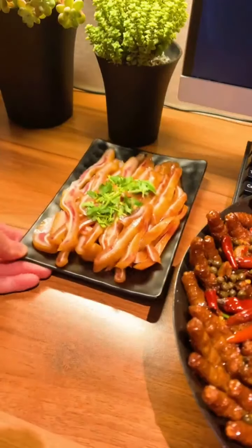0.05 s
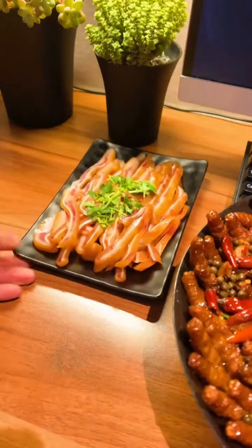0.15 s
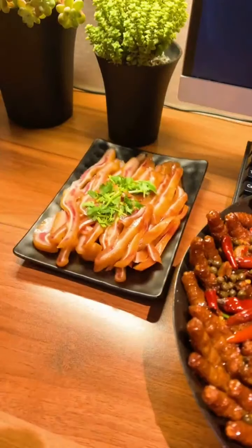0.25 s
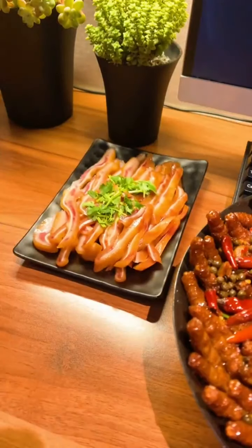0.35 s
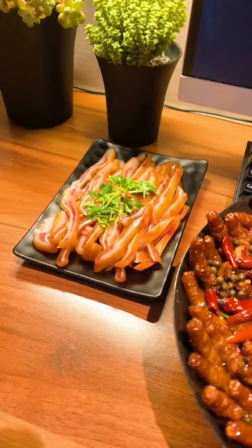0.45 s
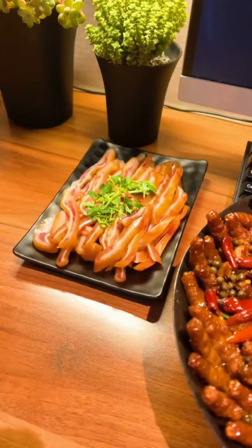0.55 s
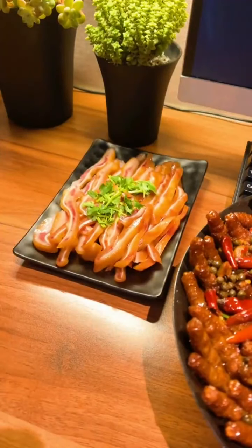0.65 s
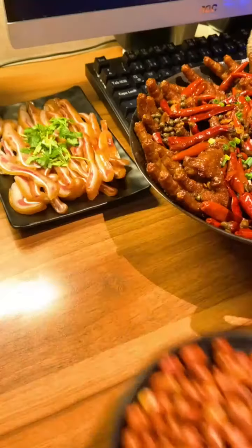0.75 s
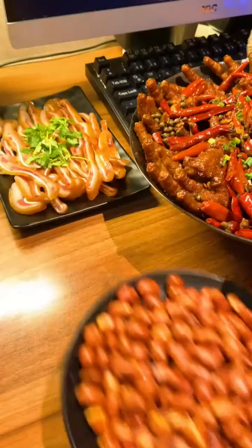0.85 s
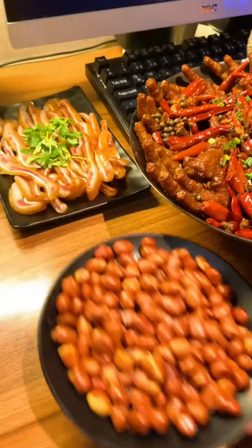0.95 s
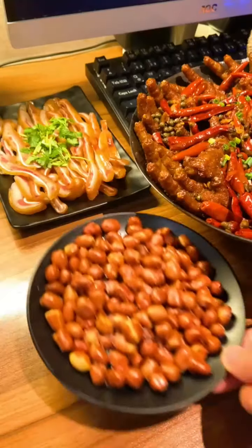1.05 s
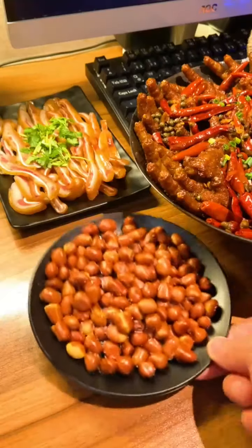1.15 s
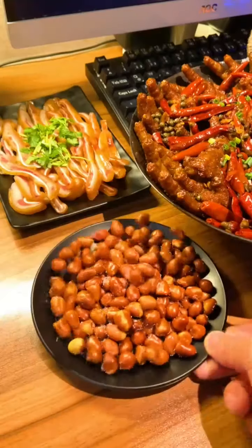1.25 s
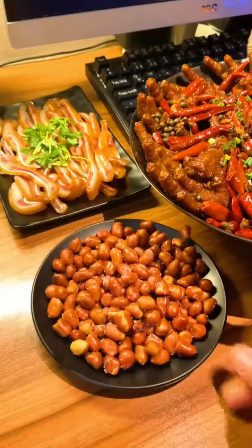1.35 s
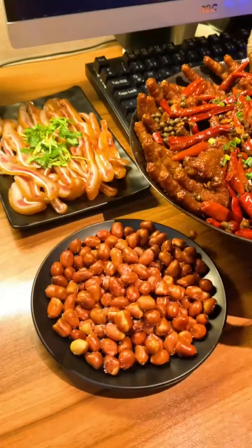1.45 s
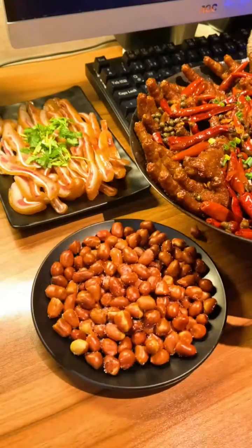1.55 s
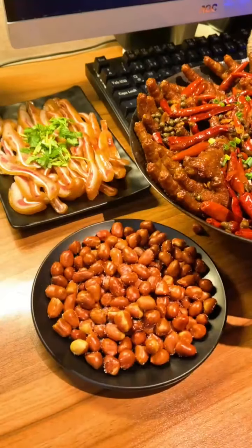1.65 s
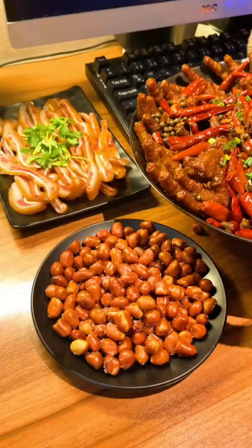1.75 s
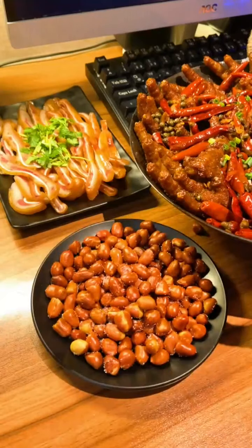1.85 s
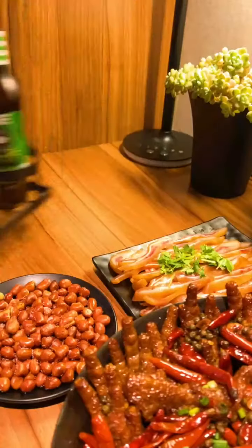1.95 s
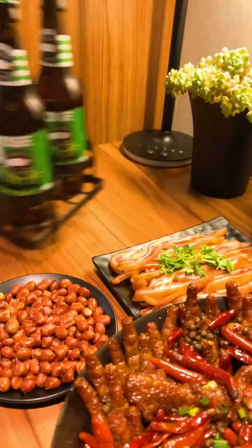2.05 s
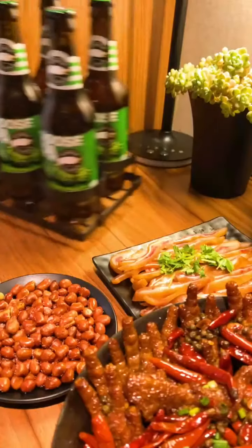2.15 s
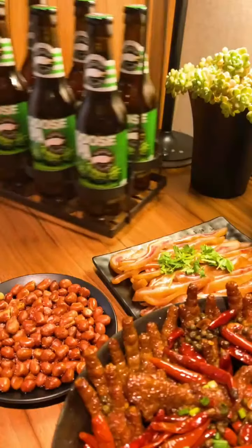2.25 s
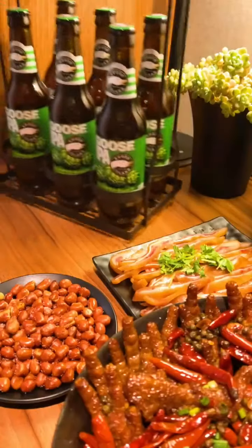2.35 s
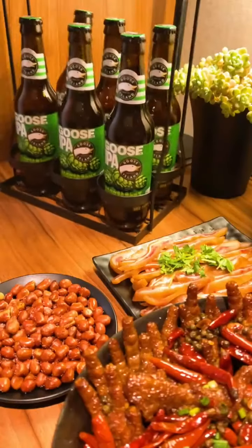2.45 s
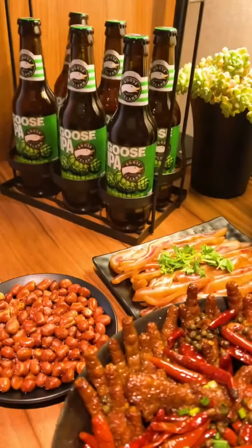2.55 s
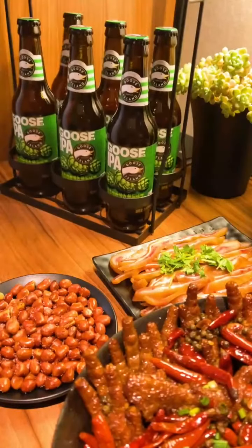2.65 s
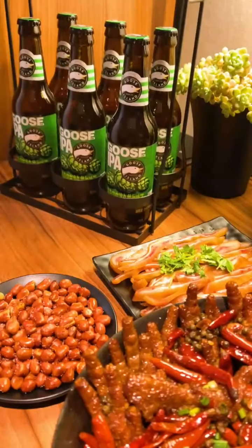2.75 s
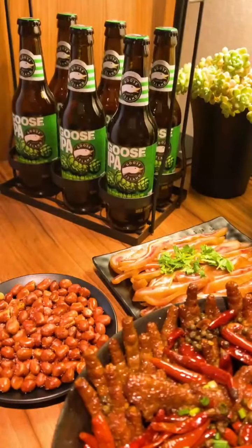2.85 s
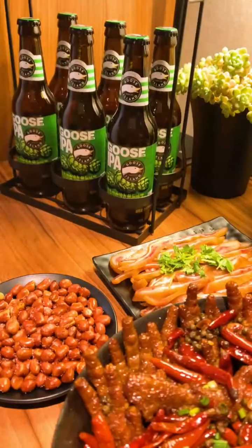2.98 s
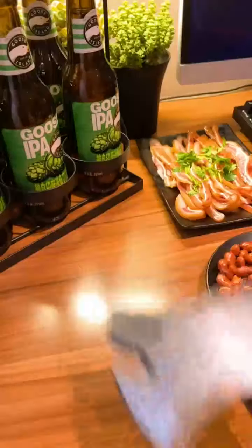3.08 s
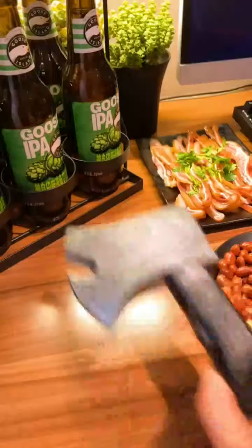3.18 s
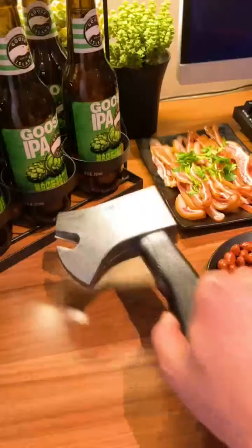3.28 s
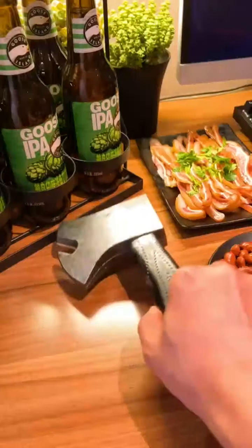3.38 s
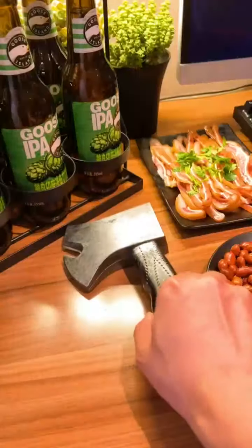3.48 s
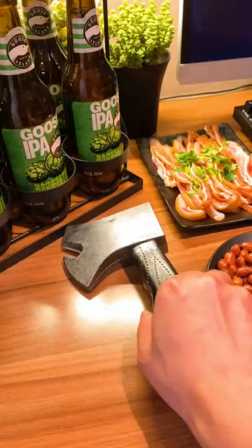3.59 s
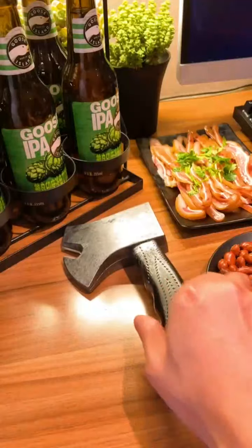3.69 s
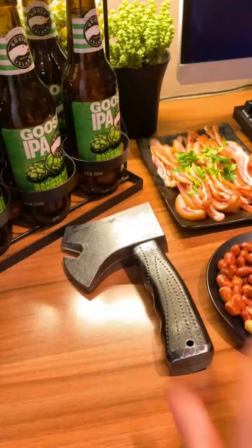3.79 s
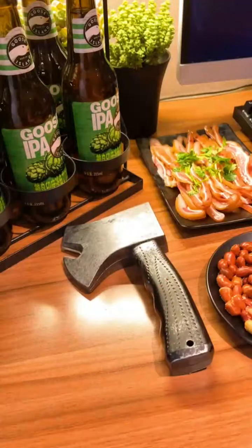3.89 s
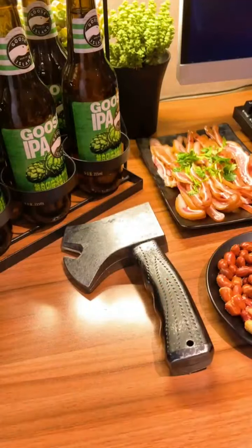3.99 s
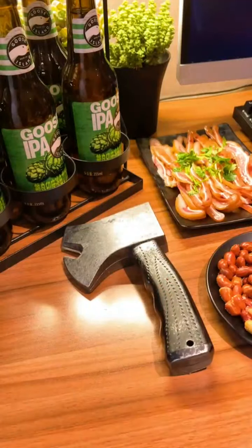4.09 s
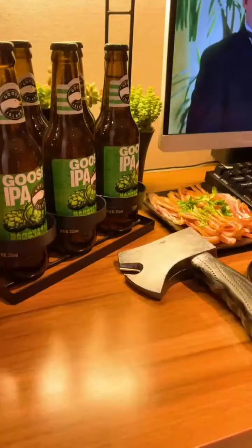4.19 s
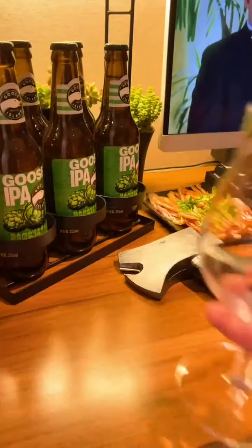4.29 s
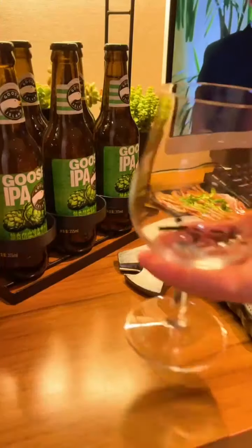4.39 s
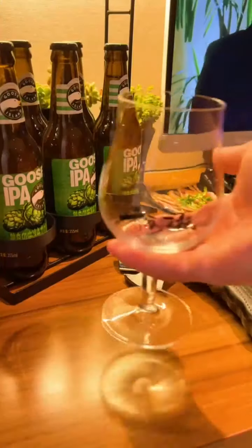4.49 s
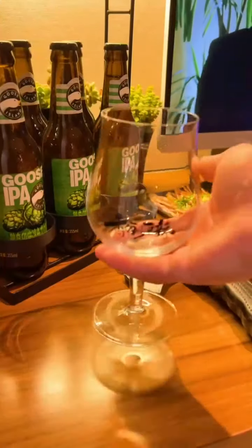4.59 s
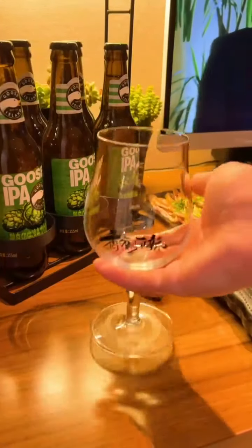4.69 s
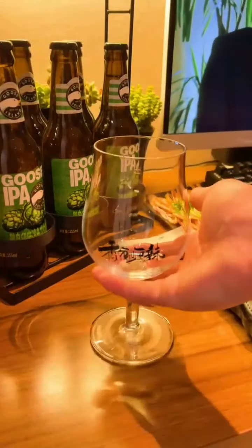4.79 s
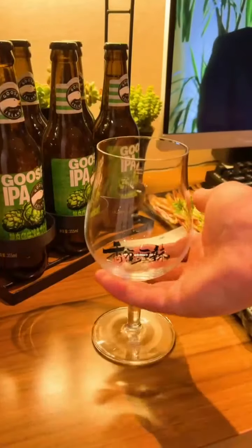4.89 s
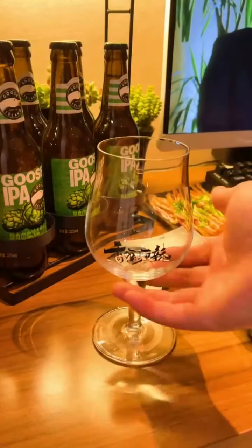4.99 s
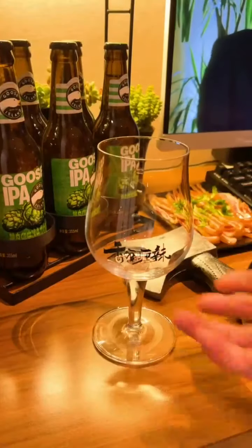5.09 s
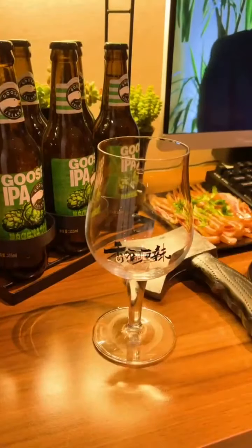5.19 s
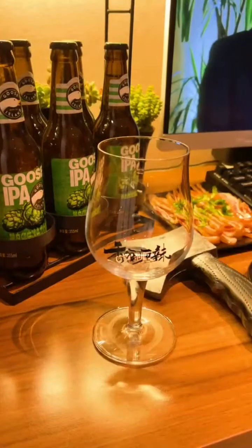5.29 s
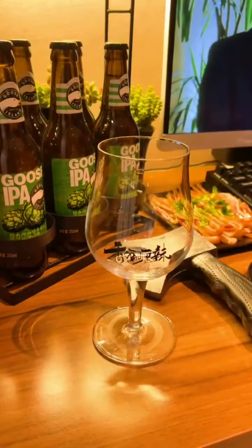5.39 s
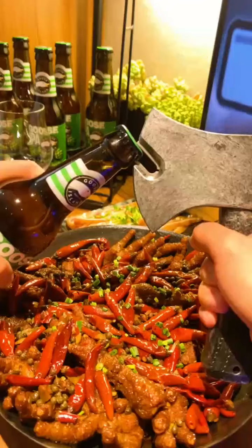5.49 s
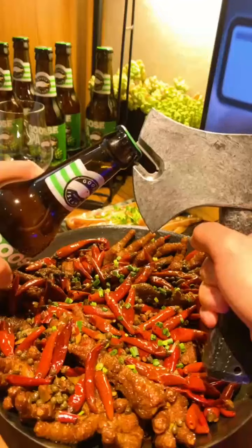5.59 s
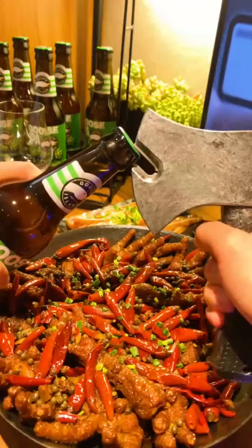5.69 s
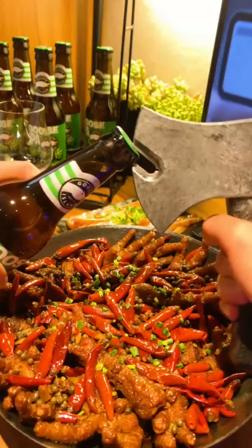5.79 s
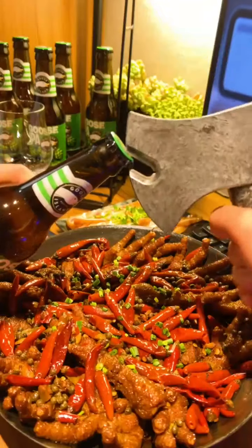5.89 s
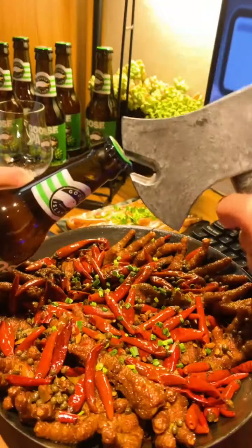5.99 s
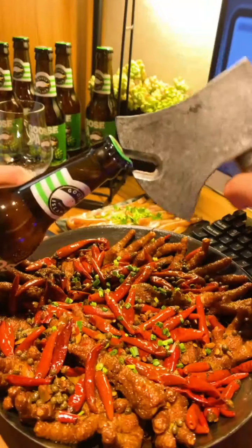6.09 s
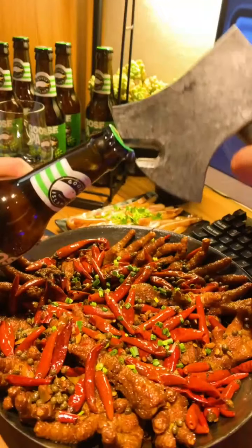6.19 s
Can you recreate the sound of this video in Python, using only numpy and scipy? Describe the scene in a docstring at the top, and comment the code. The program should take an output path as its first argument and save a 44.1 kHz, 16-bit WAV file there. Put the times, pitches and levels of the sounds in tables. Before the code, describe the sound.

Close-miked objects land one by one on a wooden desk: a plate in a double knock, a louder dish with peanut ticks, a boomy wire crate with jingling bottles, a hatchet in a dull double clunk, and a stemmed glass in a quick patter. Abrupt edits stop each tail. Last, a pressurized bottle gives a brief, high, sputtering hiss in the small room, over soft fan hum.

```python
"""Two plates, a wire crate of beer bottles, a hatchet and a stemmed glass are set down on a wooden desk
in a small room: each contact sums a noise crack, a noise knock dying in the room, and modes of thing and desk.
Then a crown cap is levered up and gas hisses out: shaped noise with whistles, under a draining-pressure envelope.
Bottles clink, peanuts tick, a thin hum and a fan drone lie behind. Each cut ends whatever still rings.
The knocks overload a close microphone."""
import sys
import numpy as np
from scipy import signal
from scipy.fft import rfft, irfft, next_fast_len
from scipy.io import wavfile

SR = 44100
rng = np.random.default_rng(int(sys.argv[2]) if len(sys.argv) > 2 else 0)


def transcribe(u):
    """Save the signal u as a 16-bit wav file named by the first command-line argument.

    u: samples, shape (n,) or (channels, n), limited to [-1, 1]; the rate is SR.
    q: integer samples, one column per channel.
    """
    v = np.clip(np.atleast_2d(u).T, -1, 1)
    q = np.round(v * 32767).astype(np.int16)
    wavfile.write(sys.argv[1], SR, q)


N = 275184

# Cuts that end every ring. Each entry: time in seconds.
CUTS = [.728, 1.887, 3.081, 4.213, 5.448]
# Landings of the crate. Each row: start in seconds, level in dB.
CRATE_CONTACTS = [(2.409, -33), (2.4262, -7)]
# Crate rocking to rest. One row: start in seconds, level in dB, first gap in seconds, loss per contact in dB.
CRATE_ROCKING = (2.497, -5, .042, 6.2)
# Gas jet spectrum. Each row: frequency in Hz, relative level in dB per Hz.
JET_SPECTRUM = [(100, -39), (500, -30.5), (2500, -25.5), (3900, -17), (4600, -10.5), (6800, -6.5),
                (8500, -2), (9800, -4.5), (10800, -10), (12500, -16), (14000, -9.5), (16000, -19)]


def amp(db):
    """Decibels to gain."""
    return 10 ** (np.asarray(db) / 20)


def unit(x):
    """Scale to rms 1."""
    return x / np.sqrt(np.mean(x ** 2) + 1e-20)


def along(points, hz):
    """Interpolate (Hz, value) points on a log frequency axis."""
    f, v = np.transpose(points)
    return np.interp(np.log(hz + 1), np.log(f + 1), v)


def filtered(x, response):
    """Multiply the spectrum of x by a response of frequency."""
    m = next_fast_len(len(x) + SR // 4)
    spectrum = rfft(x, m) * response(np.fft.rfftfreq(m, 1 / SR))
    return irfft(spectrum, m)[:len(x)]


def noise(response, size):
    """Coloured noise of rms 1."""
    return unit(filtered(rng.standard_normal(size), response))


def jet_noise(size):
    """Noise with the gas jet's spectrum."""
    return noise(lambda hz: amp(along(JET_SPECTRUM, hz)), size)


def resonances(peaks, hz):
    """Response of (Hz, width Hz, dB) resonances in parallel."""
    return sum(amp(db) * 1j * hz * w / (c * c - hz * hz + 1j * hz * w) for c, w, db in peaks)


def dying(x, t60_scale):
    """Each frequency of x decays at the room's rate."""
    # Room decay. Each row: frequency in Hz, t60 in seconds at scale 1.
    room_decay = [(60, .35), (200, 0.89), (600, 0.41), (1400, 0.35), (3000, 0.28), (6000, 0.23),
                  (14000, 0.17)]
    hz, t, z = signal.stft(x, SR, nperseg=256)
    t60 = t60_scale * along(room_decay, hz)[:, None]
    fall = np.exp(-np.log(1000) * t / t60)
    return signal.istft(z * fall, SR, nperseg=256)[1][:len(x)]


def fade(t60):
    """One second of exponential decay."""
    return np.exp(-np.log(1000) * np.arange(SR) / SR / t60)


def ring(modes, scatter_db, waver=.45, attack_s=.0005):
    """Decaying modes of random strength; reflections make each one waver in level and phase."""
    out = np.zeros(SR)
    for hz, db, t60 in modes:
        t = np.arange(min(SR, int(1.5 * t60 * SR))) / SR
        strength, phase = rng.standard_normal(2)
        points = rng.standard_normal(36) + 1j * rng.standard_normal(36)
        echoes = np.interp(t, np.linspace(0, 1, 36), points)
        tone = (1 + waver * echoes) * np.exp(2j * np.pi * (hz * t + phase))
        envelope = np.exp(-np.log(1000) * t / t60) * (1 - np.exp(-t / attack_s))
        out[:len(t)] += amp(db + scatter_db * strength) * envelope * unit(tone.real)
    return out


def add(track, s, sound):
    """Place a sound at s seconds; the next cut ends it."""
    start = round(s * SR)
    later_cuts = [round(c * SR) for c in CUTS if c > s]
    end = min(later_cuts + [N, start + len(sound)])
    track[start:end] += sound[:end - start]


def chime(strikes, modes, waver):
    """Light touches: modes ring without a knock."""
    out = np.zeros(N)
    for s, db in strikes:
        add(out, s, amp(db) * ring(modes, scatter_db=1, waver=waver))
    return out


def rocking(rock, count):
    """(s, dB) contacts of a thing that rocks to rest, each sooner and weaker than the last."""
    s, db, gap_s, loss_db = rock
    k = np.arange(count)
    gaps_s = gap_s * .92 ** k
    return list(zip(s + np.cumsum(gaps_s) - gaps_s, db - loss_db * k))


def room_tone(air_db, drone_db, near_db):
    """Still air and a computer fan's low drone as shaped noise; more resonances join after the last cut."""
    # Air spectrum. Each row: frequency in Hz, relative level in dB per Hz.
    air_spectrum = [(15, -70), (25, -39), (43, -19.5), (97, -13.5), (130, -17), (217, -1), (249, -13),
                    (326, -7.5), (363, -13.5), (607, -14.5), (962, -17.5), (1330, -15.5), (1700, -21.5),
                    (14800, -34.5), (16000, -37.5)]
    drone_peaks = [(220, 27, 2.5), (337, 12, -14.5), (584, 20, -12.5), (1280, 50, -20)]
    near_peaks = [(93, 9.6, -2), (339.3, 10.5, 3), (426.4, 13.7, -1), (493, 20, -15)]
    air = noise(lambda hz: amp(along(air_spectrum, hz)), N)
    drone = noise(lambda hz: resonances(drone_peaks, hz), N)
    near = noise(lambda hz: resonances(near_peaks, hz), N)
    after_last_cut = np.arange(N) / SR > CUTS[-1]
    return amp(air_db) * air + amp(drone_db) * drone + amp(near_db) * near * after_last_cut


def hum(start_s, attack_s, level_db):
    """Narrow noise band swells after the dish has settled and holds until the cut."""
    out = np.zeros(N)
    swell = np.minimum(np.arange(SR) / SR / attack_s, 1)
    tone = noise(lambda hz: resonances([(377, 8, 0)], hz) ** 2, SR)
    add(out, start_s, amp(level_db) * swell * tone)
    return out


def peanuts(start_s, span_s, level_db, fall_db, count):
    """Peanuts hop in the dish and settle: noise ticks of random strength, fainter on the whole."""
    spectrum = [(1500, -13), (5500, 5), (9000, -2), (15000, -15.5)]
    out = np.zeros(N)
    for when, size in zip(np.linspace(0, 1, count), rng.standard_normal(count)):
        tick = noise(lambda hz: amp(along(spectrum, hz)), SR) * fade(.088)
        s = start_s + span_s * (when + rng.random() / count)
        add(out, s, amp(level_db - fall_db * when + 2.9 * size) * tick)
    return out


def wire():
    """A bottle leans into the crate's wire, which rings in its modes."""
    # Wire contact. Each row: start in seconds, level in dB.
    strikes = [(2.742, -34)]
    # Wire modes. Each row: frequency in Hz, relative level in dB, t60 in seconds.
    modes = [(1100, -10, .2), (1440, -4, .2), (1523, -4, .25)]
    return chime(strikes, modes, waver=.6)


def bottles(jolt_db, clink_db, carry_s, carry_span_s, carry_db, count):
    """Bottles touch while carried, jingle on landing, then knock together; one rings on in its own modes."""
    # Knocks between bottles. Each row: start in seconds, level in dB before clink_db.
    clinks = [(2.5644, -9), (2.7414, -32), (2.7721, -25), (2.8944, -40)]
    # Bottle modes. Each row: frequency in Hz, relative level in dB, t60 in seconds.
    bottle_modes = [(1480, -3, .2), (2115, -3, .3), (2440, -6, .2), (2600, -8, .15), (2745, -8, .18),
                    (3563, -7, .13), (3690, -6, .13), (4145, -15, .12), (6400, -16, .12), (6900, -16, .12)]
    # Modes of the one that rings on. Each row: frequency in Hz, level in dB, t60 in seconds.
    lasting_modes = [(2112, -24, .85), (2143, -28, .8), (6406, -36, .35)]
    carried = [(carry_s + carry_span_s * (k + chance / 2) / count, carry_db)
               for k, chance in enumerate(rng.random(count))]
    landings = CRATE_CONTACTS + rocking(CRATE_ROCKING, count=3)
    jolted = [(s, db + jolt_db) for s, db in landings]
    knocked = [(s, db + clink_db) for s, db in clinks]
    jingle = chime(carried + jolted + knocked, bottle_modes, waver=.6)
    return jingle + chime([(2.54, 0)], lasting_modes, waver=.4)


def gas_flow(seal_opens_s, drain_s, gas_db):
    """The gap widens as the cap bends, and the neck's pressure drains through it."""
    u = np.maximum(np.arange(N) / SR - seal_opens_s, 0) / drain_s
    gap, pressure = u ** 2, np.exp(-u ** 3)
    return amp(gas_db) * gap * pressure


def bottle_cap(whistle_db, flutter_db, room_db):
    """Gas jets through the lifted crimps and whistles in them; ticks mark the slipping notch and cracking seal."""
    # Whistles in the crimps. Each row: frequency in Hz, width in Hz, relative level in dB.
    whistles = [(8190, 24, 0), (8440, 16, 2), (8670, 60, -7), (9128, 16, -3), (9711, 24, -1)]
    # Hatchet notch slips on the cap, seal cracks. Each row: start in seconds, level in dB.
    ticks = [(5.8174, -47.5), (5.8925, -21), (6.085, -46.5)]
    flutter = noise(lambda hz: hz < 400, N)  # the wet seal sputters
    jet = jet_noise(N)
    whistle = noise(lambda hz: resonances(whistles, hz), N)
    flow = gas_flow(seal_opens_s=5.878, drain_s=.067, gas_db=-2)
    out = flow * amp(flutter_db * flutter) * unit(jet + amp(whistle_db) * whistle)
    for s, db in ticks:
        add(out, s, amp(db) * jet_noise(SR) * fade(.018))
    # the walls swallow the top
    tail = dying(noise(lambda hz: 1 / (1 + (hz / 8000) ** 2), SR), t60_scale=.85)
    reverb = signal.fftconvolve(out, tail / np.linalg.norm(tail))[:N]
    return out + amp(room_db) * reverb


def set_down(contacts, knock, modes, crack_db, crack_t60, softening, boom_db, tilt_db, t60_scale,
             boom_rise=0, dulling=0, shortening=0, soft_hz=np.inf, ripple_db=4):
    """Each contact: a short direct crack, a knock that fills the room, the thing's ring, the desk's boom."""
    # Desk modes. Each row: frequency in Hz, relative level in dB, t60 in seconds.
    desk_modes = [(154.8, -9.5, 0.49), (167.5, -4.5, 0.14), (184, -13.5, 0.12), (209.5, -4.5, 0.39),
                  (252, -3.5, .35), (334, -4.5, .35), (435, -8.5, .3), (553.5, -2, 0.37)]
    out = np.zeros(N)
    grid_hz = np.geomspace(700, 16000, 170)
    # crowded small modes, alike at every contact
    ripple = ripple_db * np.clip(rng.standard_normal(len(grid_hz)), -1.5, 1.5)
    hardest_db = max(db for s, db in contacts)
    for s, db in contacts:
        # per dB under the hardest contact: duller (dB per octave), shorter, another share of boom
        lighter_db = hardest_db - db
        tilt = tilt_db - dulling * lighter_db
        scale = t60_scale * np.exp(-shortening * lighter_db)

        def colour(hz):
            level_db = along(knock, hz) + np.interp(hz, grid_hz, ripple, left=0)
            level_db = level_db + tilt * np.log2(1 + hz / 1000)
            return amp(level_db) / np.sqrt(1 + (hz / soft_hz) ** 8)  # a soft contact has no top

        # softening: the crack loses extra dB per dB of level
        crack = amp(crack_db + softening * db) * noise(colour, SR) * fade(crack_t60 * scale)
        body = dying(noise(colour, SR), scale)
        boom = amp(boom_db + boom_rise * lighter_db) * ring(desk_modes, scatter_db=1.5, attack_s=.004)
        mode_tilt = .38 * dulling * lighter_db  # share of the dulling that reaches the modes
        struck = [(hz, mode_db - mode_tilt * np.log2(1 + hz / 1000), t60) for hz, mode_db, t60 in modes]
        add(out, s, amp(db) * (crack + body + ring(struck, scatter_db=.37) + boom))
    return out


def plate():
    """A plate lands twice; the lighter contact is duller and shorter."""
    # Contacts. Each row: start in seconds, level in dB.
    contacts = [(.0452, -6.5), (.075, -12.5)]
    # Knock spectrum. Each row: frequency in Hz, relative level in dB per Hz.
    knock = [(40, -20), (120, -25), (220, -4.5), (370, -10.5), (520, 1), (1100, 1.5), (1500, -1),
             (3100, -3.5), (6000, -12.5), (10000, -29.5), (16000, -35)]
    # Modes. Each row: frequency in Hz, relative level in dB, t60 in seconds.
    modes = [(484, -7, .16), (710, -20, .45), (935, -13, .2), (1130, -13, .25), (2077, -24, .45),
             (2250, -14, .18), (2950, -11, .17), (3079, -11, .22), (4123, -17, .18)]
    return set_down(contacts, knock, modes, crack_db=9.5, crack_t60=.12, softening=.1, boom_db=-13,
                    tilt_db=2.3, t60_scale=1, boom_rise=-.8, dulling=1.5, shortening=.14)


def dish():
    """The second plate, a dish, lands, a finger flicks off its rim, and it rocks to rest in soft contacts."""
    # Landings, then rim flick. Each row: start in seconds, level in dB.
    contacts = [(1.1795, -0.5), (1.204, -14.5), (1.258, -19), (1.272, -18.5), (1.292, -21)]
    rim_contacts = [(1.473, -35)]
    # Rocking. One row: start in seconds, level in dB, first gap in seconds, loss per contact in dB.
    rock = (1.5135, -32, .0305, 3.7)
    # Knock spectra of dish and rim. Each row: frequency in Hz, relative level in dB per Hz.
    knock = [(40, -20), (120, -19.5), (200, -13.5), (400, -9), (700, -4), (1200, 2), (2000, -4),
             (3300, -5.5), (6000, -10), (9000, -25.5), (16000, -31)]
    rim_knock = [(200, -8), (650, 3), (1300, -6), (4500, -12), (9000, -10), (16000, -15)]
    # Modes. Each row: frequency in Hz, relative level in dB, t60 in seconds.
    modes = [(592, -10, .17), (624, -23, .35), (860, -10, .22), (1030, -11, .22), (1238, -11, .3),
             (1625, -13, .2), (2379, -19, .16), (3316, -25, .22), (4855, -21, .13)]
    landing = set_down(contacts, knock, modes, crack_db=4, crack_t60=.14, softening=.03, boom_db=-15,
                       tilt_db=2.7, t60_scale=.9, boom_rise=-.2, dulling=.24, shortening=.026)
    rim = set_down(rim_contacts, rim_knock, modes, crack_db=2, crack_t60=.14, softening=0, boom_db=-30,
                   tilt_db=0, t60_scale=.2)
    settling = set_down(rocking(rock, count=4), knock, modes, crack_db=3, crack_t60=.14, softening=0,
                        boom_db=-30, tilt_db=2.5, t60_scale=.32, dulling=.25, soft_hz=4400)
    return landing + rim + settling


def crate():
    """The wire crate lands and rocks with strong desk boom, then wobbles in dull, soft contacts."""
    # Late wobble. Each row: start in seconds, level in dB.
    wobble_contacts = [(2.772, -31.5), (2.87, -39), (2.937, -33.5), (2.995, -46)]
    # Knock spectrum. Each row: frequency in Hz, relative level in dB per Hz.
    knock = [(40, -23), (110, -10), (170, -1.5), (350, -2.5), (550, 4.5), (800, -3), (1400, 1.5),
             (1900, -9), (2500, -6), (5000, -20.5), (6800, -24), (8500, -37.5), (16000, -45)]
    # Modes. Each row: frequency in Hz, relative level in dB, t60 in seconds.
    modes = [(156, -24, 1.1), (168, -7, .3), (247, -21, 1.0), (549, -23, .8), (1173, -13, .25),
             (2433, -15, .22), (3563, -26, .2)]
    landings = CRATE_CONTACTS + rocking(CRATE_ROCKING, count=3)
    landing = set_down(landings, knock, modes, crack_db=5, crack_t60=.22, softening=.2, boom_db=-5.5,
                       tilt_db=2.2, t60_scale=.76, boom_rise=-.7, dulling=.05)
    wobble = set_down(wobble_contacts, knock, modes, crack_db=-5, crack_t60=.22, softening=0, boom_db=-1.5,
                      tilt_db=-5.5, t60_scale=1.1, boom_rise=.5, dulling=1.3, soft_hz=3500)
    return landing + wobble


def hatchet():
    """The hatchet lands twice; the lighter contact has relatively more desk boom."""
    # Contacts. Each row: start in seconds, level in dB.
    contacts = [(3.4502, -4.4), (3.486, -11)]
    # Knock spectrum. Each row: frequency in Hz, relative level in dB per Hz.
    knock = [(40, -36.5), (120, -28), (200, -18), (370, -8), (620, 0), (1050, -6), (1450, -17.5),
             (3100, -13), (4500, -20), (7000, -23.5), (10000, -43), (16000, -47.5)]
    # Modes. Each row: frequency in Hz, relative level in dB, t60 in seconds.
    modes = [(440, -12, .2), (624, -19, .9), (636, -8, .2), (672, -11, .2), (765, -26, .5), (1022, -11, .2),
             (1087, -14, .2), (1141, -26, .42), (2088, -33, .48), (2734, -21, .15)]
    return set_down(contacts, knock, modes, crack_db=7.5, crack_t60=.15, softening=.1, boom_db=-17,
                    tilt_db=-.1, t60_scale=.77, boom_rise=1.6)


def glass():
    """The stemmed glass rocks to rest on its foot while its bowl sings on in beating mode pairs."""
    # Rocking. One row: start in seconds, level in dB, first gap in seconds, loss per contact in dB.
    rock = (4.7357, -7.5, .0249, 1.9)
    # Knock spectrum. Each row: frequency in Hz, relative level in dB per Hz.
    knock = [(40, -41), (115, -24.5), (200, -12), (450, -5.5), (700, -2), (1200, -13), (2100, -4.5),
             (2900, -21.5), (4600, -22.5), (6200, -13.5), (8500, -31.5), (16000, -37)]
    # Modes of the knocked glass, then of its bowl. Each row: frequency in Hz, level in dB, t60 in seconds.
    modes = [(330, -10, .25), (667, -6, .24), (800, -9, .2), (2050, -8, .22), (3490, -10, .14),
             (3525, -6, .17), (5297, -19, .24), (5695, -16, .17), (6400, -8, .05), (10131, -22, .17),
             (11929, -28, .16)]
    bowl_modes = [(792, -45.5, 12), (800.8, -44.5, 12), (1974, -46, 3.3), (1998.6, -39, 3.3),
                  (3735, -40, .85)]
    landing = set_down(rocking(rock, count=6), knock, modes, crack_db=7.5, crack_t60=.056, softening=.1,
                       boom_db=-13, tilt_db=1, t60_scale=.88, boom_rise=.95, dulling=.4, shortening=.015)
    return landing + chime([(4.7605, 0)], bowl_modes, waver=.06)


def scene():
    """The table is laid, then the bottle is opened."""
    background = room_tone(air_db=-52.8, drone_db=-58, near_db=-57)
    background += hum(start_s=1.635, attack_s=.04, level_db=-52.5)
    nuts = peanuts(start_s=1.27, span_s=.15, level_db=-37.5, fall_db=17, count=14)
    clinks = bottles(jolt_db=-15, clink_db=-11, carry_s=1.9, carry_span_s=.42, carry_db=-57.5, count=3)
    cap = bottle_cap(whistle_db=-.5, flutter_db=1.4, room_db=-8.5)
    set_things = plate() + dish() + crate() + hatchet() + glass()
    return (background + nuts + wire() + clinks + cap + set_things)[None]


def record(dry):
    """The microphone clips on hard knocks and passes little deep bass; the level dips briefly at each cut."""
    x = dry[0]
    clipped = x / (1 + np.abs(x / .88) ** 6) ** (1 / 6)
    t = np.arange(N) / SR
    dips = np.prod([1 - .85 * np.exp(-((t - c) / .0045) ** 4) for c in CUTS], axis=0)
    low_cut_hz, top_hz = 30, 15550

    def passband(hz):
        return 1j * hz / (low_cut_hz + 1j * hz) / (1 + (hz / top_hz) ** 150)

    return filtered(clipped * dips, passband)[None]


dry = scene()
out = record(dry)
transcribe(out)
```